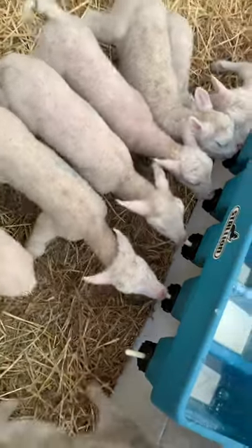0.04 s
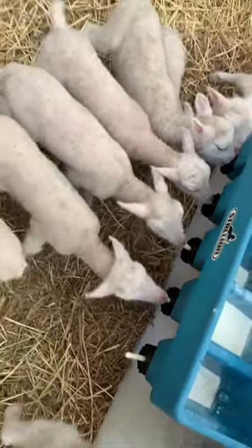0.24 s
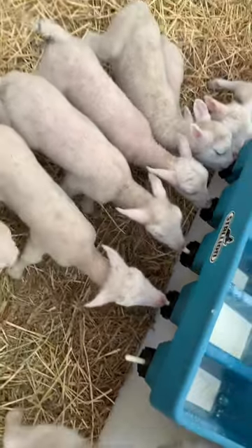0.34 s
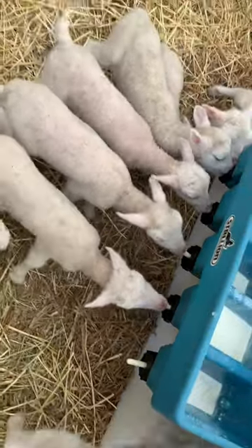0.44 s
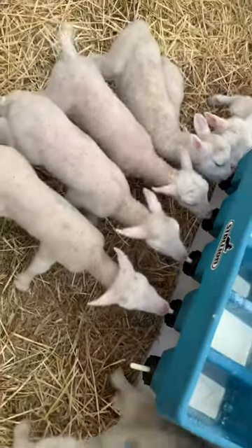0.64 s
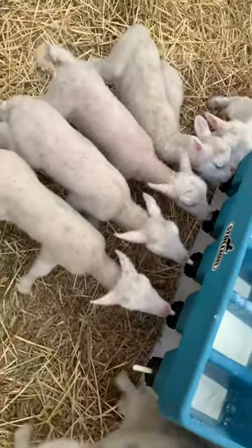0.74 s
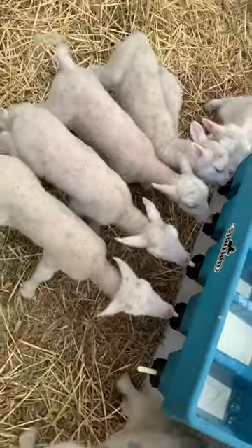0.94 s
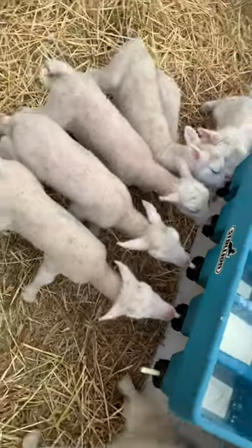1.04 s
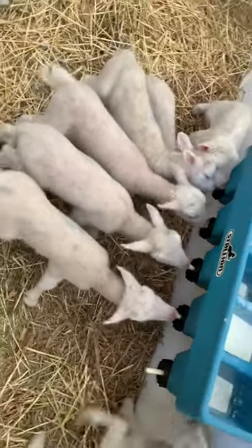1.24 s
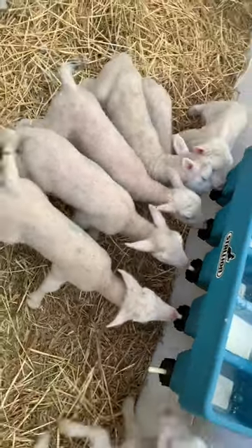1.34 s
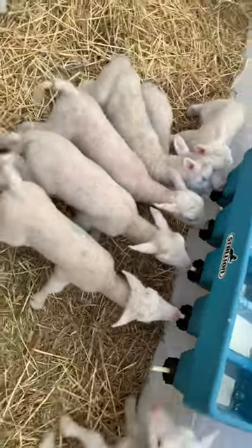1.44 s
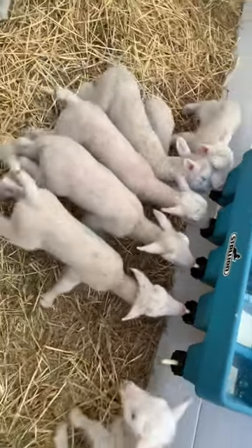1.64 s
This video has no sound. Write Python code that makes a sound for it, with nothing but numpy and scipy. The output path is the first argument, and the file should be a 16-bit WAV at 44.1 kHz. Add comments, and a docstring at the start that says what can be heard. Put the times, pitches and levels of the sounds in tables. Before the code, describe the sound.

A lamb gives one long, high bleat while muzzles knock a plastic milk feeder.

```python
"""Lambs at a milk feeder

Muzzles knock a plastic tub, which rings, and shoves set the whole feeder swaying. One lamb gives
a long, clear, high bleat that rises, holds and breaks off downwards: vocal-fold harmonics that
swell and fade. Underneath lie a low hum, barn rumble and the rustle and snap of straw."""
import sys
import numpy as np
from scipy import signal
from scipy.fft import rfft, irfft
from scipy.io import wavfile

SR = 44100
rng = np.random.default_rng(int(sys.argv[2]) if len(sys.argv) > 2 else 0)


def store_wav(level_fs):
    """Save 16-bit WAV to argv[1]."""
    pcm = np.round(np.clip(np.atleast_2d(level_fs), -1, 1) * 32767)
    wavfile.write(sys.argv[1], SR, pcm.T.astype(np.int16))


N = 74970
T = np.arange(N) / SR
BINS_HZ = np.fft.rfftfreq(N, 1 / SR)


def from_db(db):
    """Decibels to gain."""
    return 10 ** (np.asarray(db) / 20)


def unit_rms(x):
    """Scale to rms 1."""
    return x / np.sqrt(np.mean(x ** 2) + 1e-20)


def in_time(rows):
    """Value columns of a time table at every sample."""
    times, *columns = np.transpose(rows)
    return [np.interp(T, times, column) for column in columns]


def at_hz(rows, hz):
    """Interpolate a spectrum over log frequency."""
    freqs, values = np.transpose(rows)
    return np.interp(np.log(hz + 1e-9), np.log(freqs), values)


def drift(corner_hz):
    """Low-passed noise, rms 1."""
    hop = 40
    pole = np.exp(-2 * np.pi * corner_hz * hop / SR)
    noise = rng.standard_normal(N // hop + 2002)
    slow = signal.lfilter([1], [1, -2 * pole, pole * pole], noise)[2000:]
    return np.interp(np.arange(N) / hop, np.arange(len(slow)), unit_rms(slow))


def ring(x, hz, t60):
    """One mode: a unit impulse starts a decaying unit sine."""
    r, w = from_db(-60 / (t60 * SR)), 2 * np.pi * hz / SR
    return signal.lfilter([0, np.sin(w)], [1, -2 * r * np.cos(w), r * r], x + 1e-18)


def band(x, low_hz, high_hz, order=2):
    """Causal band-pass."""
    sos = signal.butter(order, [low_hz, high_hz], "band", fs=SR, output="sos")
    return signal.sosfilt(sos, x + 1e-18)


def decay(t, t60):
    """Envelope from t = 0, falling 60 dB in t60."""
    return (t >= 0) * np.exp(-np.log(1000) * np.maximum(t, 0) / t60)


def barn_reverb(x, t60=0.59, delay_s=0.0045, lowpass_hz=3260):
    """Diffuse, dull tail, alike on both sides in the bass."""
    t = T[:SR // 2]
    mid, side = rng.standard_normal((2, len(t))) * decay(t - delay_s, t60)
    side = band(side, 590, 21050, order=1)
    tail = signal.lfilter(*signal.butter(1, lowpass_hz, fs=SR), [mid + side, mid - side])
    return signal.fftconvolve(x[None], unit_rms(tail) / np.sqrt(len(t)), axes=1)[:, :N]


def hum(hz=95.6, rms_db=-51, waver_db=2.5):
    """Low tone of wavering level."""
    return from_db(rms_db + waver_db * drift(31)) * np.sqrt(2) * np.sin(2 * np.pi * hz * T)


# Barn noise spectrum: f/Hz, relative density/dB
BARN_SPECTRUM = [(25, -79), (60, 8), (90, -45), (140, -6), (250, -3.5), (450, -7.5), (800, -12),
                 (1500, -9.5), (3000, -16), (4500, -19), (6500, -7.5), (8000, -14.5), (11000, -9),
                 (15500, -19.5)]
# Barn noise envelope: t/s, level/dB
BARN_LEVEL = [(0, -43.5), (.15, -49), (.25, -42), (.5, -40), (.8, -50.5), (1.3, -48), (1.5, -49),
              (1.7, -46.5)]
# Left-right likeness: f/Hz, correlation
BARN_CORRELATION = [(100, 0.98), (300, 0.86), (1000, 0.36), (2500, 0.45), (6500, 0.27), (11000, 0.0064)]


def barn_noise(waver_db=1.5):
    """Rumble of the barn and hiss of trodden straw."""
    mid, side = rfft(rng.standard_normal((2, N))) * from_db(at_hz(BARN_SPECTRUM, BINS_HZ))
    alike = at_hz(BARN_CORRELATION, BINS_HZ)
    noise = irfft(np.sqrt(1 + alike) * mid + np.sqrt(1 - alike) * side * [[1], [-1]], N)
    return unit_rms(noise) * from_db(in_time(BARN_LEVEL)[0] + waver_db * drift(45))


# Breaking stalks: t/s, level before filter/dB
STRAW_SNAPS = [(0.128, -44), (0.156, -38), (1.425, -36), (1.621, -32)]


def straw_snaps(t60=0.013):
    """Stalks crack brightly under the hooves."""
    envelope = sum(from_db(db) * decay(T - onset, t60) for onset, db in STRAW_SNAPS)
    return band(envelope * rng.standard_normal(N), 4970, 19000, order=1)


# Soft, heavy shoves: t/s, level/dB, f/Hz, t60/s
SHOVES = [(0.043, -30.5, 88.7, 0.43), (0.0775, -42, 90, 0.18), (0.135, -22, 113, 0.078),
          (0.188, -35, 91, 0.062), (0.262, -33.5, 70.4, 0.4), (0.363, -27.5, 101, 0.2),
          (0.431, -34, 79.5, .15), (1.223, -34.5, 71, 0.13), (1.286, -32, 89.5, 0.14),
          (1.521, -36, 88, 0.079)]


def feeder_thumps(rise_s=0.014):
    """The whole feeder sways briefly after each shove."""
    out = np.zeros(N)
    for onset, db, hz, t60 in SHOVES:
        t = T - onset
        envelope = np.clip(t / rise_s, 0, 1) * decay(t, t60)
        out += from_db(db) * envelope * np.sin(2 * np.pi * hz * t)
    return out


# Tub modes: f/Hz, relative level/dB, t60/s
TUB_MODES = [(147, 5.5, 0.051), (218.4, 0, 0.13), (266.6, -7.5, 0.47), (333, 8.5, 0.057), (550, -11, 0.09),
             (705, 3.5, 0.024), (979, -10.5, 0.076), (1025, 9, 0.016), (1210, -41, 0.024),
             (1620, 8.5, 0.013), (2520, -45, 0.018), (3800, -19, 0.011)]


def tub_ring(contact):
    """Plastic tub ringing under a contact, peak 1."""
    body = sum(from_db(db) * ring(contact, hz, t60) for hz, db, t60 in TUB_MODES)
    return body / np.abs(body).max()


# Muzzle contacts: t/s, level/dB, centre f/Hz, rattle t60/s, relative tick level/dB
CONTACTS = [(0.1643, -32, 1220, 0.01, 6), (0.1931, -22.5, 1060, 0.1, -7), (0.198, -30.5, 318, 0.33, -32),
            (.221, -26, 1090, 0.17, -24), (0.227, -26.5, 447, 0.096, -34), (.238, -23.5, 285, 0.088, -30),
            (0.311, -19, 300, 0.082, -16), (.327, -28, 220, 0.2, -32), (.3745, -23, 1510, 0.1, 6.5),
            (.3775, -13.5, 1240, 0.038, -40), (.380, -27, 300, 0.053, -30), (0.4211, -7.5, 860, 0.019, -30),
            (.4226, -7.5, 650, 0.02, -35), (.4284, -10.5, 650, 0.0457, -26), (.432, -22.5, 152, 0.077, -34),
            (0.479, -29, 180, 0.036, -30), (0.676, -24, 3130, 0.022, -8), (1.191, -37, 353, 0.062, -35),
            (1.619, -34, 1390, 0.039, 6.5), (1.636, -37, 260, 0.063, -5)]


def muzzle_knocks(slap_db=-2.5, ring_db=-5.5, sharp_s=0.025, band_ratio=1.67):
    """Each contact, a push and a dying rattle, slaps the tub and sets it ringing."""
    out, t = np.zeros(N + SR), T[:SR // 3]
    for onset, db, hz, t60, tick_db in CONTACTS:
        noise, grit = rng.standard_normal((2, len(t)))
        push = (t == 0) * min(1, sharp_s / t60) ** 2  # long contacts are more scuffle than push
        rattle = 0.39 * np.sqrt(hz / SR) * noise * decay(t, t60)
        contact = band(push + rattle, hz / band_ratio, hz * band_ratio)
        slap = from_db(slap_db) * contact / np.abs(contact).max()
        body = from_db(ring_db) * tub_ring(contact)
        tick = from_db(tick_db) * 0.5 * band(grit, 2500, 13000, order=1) * decay(t, t60=0.04)
        start = int(onset * SR)
        out[start:start + len(t)] += from_db(db) * (slap + body + tick)
    return out[:N]


def in_pen(x, echo_s=0.00087, echo_db=-13, right_lag_s=0.0001, reverb_db=-24.5):
    """A reflection off the side of the pen widens the sound; the barn adds its tail."""
    echo = from_db(echo_db) * np.interp(T - echo_s, T, x)
    right = np.interp(T - right_lag_s, T, x)
    return np.array([x + echo, right - echo]) + from_db(reverb_db) * barn_reverb(x)


# Moving peak, lower mids: t/s, f/Hz, boost/dB
LOW_MID_PEAK = [(0.378, 1680, 16.5), (0.45, 1670, 9.5), (0.503, 2040, 5.5), (0.536, 1420, 8.5),
                (0.604, 2000, 14), (0.689, 1210, 8), (0.743, 1745, 17), (0.861, 1900, 5.5),
                (0.927, 1330, -0.5), (1.032, 1720, 5.5), (1.2, 1510, 6.5), (1.263, 1270, 8.5),
                (1.312, 1620, 17.5)]
# Moving peak, mids: t/s, f/Hz, boost/dB
MID_PEAK = [(0.4, 2750, 14), (0.498, 2570, 2.5), (0.665, 2420, 3), (0.73, 2520.0, 8.5), (0.875, 2280, 12),
            (1.024, 2660, 11.5), (1.102, 3000, 13.5), (1.233, 2820, 8)]
# Moving peak, upper mids: t/s, f/Hz, boost/dB
UPPER_MID_PEAK = [(0.404, 3610, 10.5), (0.498, 3510, 4.5), (0.623, 3330, 16.5), (0.671, 3570, 3),
                  (0.722, 3450, 16.5), (0.749, 3800, -3), (0.815, 3520, 17.5), (0.905, 3700.0, 4),
                  (0.956, 4060, 2), (1.013, 3600, 13.5), (1.068, 3940.0, 6.5), (1.171, 3560, 12.5),
                  (1.27, 3800, 10)]
# Broad moving peak, treble: t/s, f/Hz, boost/dB
HIGH_PEAK = [(0.428, 6460, 10.5), (0.548, 6070, 7), (0.8, 6780, 7.5), (0.896, 6280.0, 10.5),
             (1.056, 7170, 2.5), (1.096, 5600, 1), (1.259, 6420, 10)]


def swells_db(hz):
    """Four moving peaks make the bleat's harmonics swell and fade."""
    db = np.zeros(N)
    for rows, width_hz in ((LOW_MID_PEAK, 368), (MID_PEAK, 308), (UPPER_MID_PEAK, 360), (HIGH_PEAK, 680)):
        centre_hz, boost_db = in_time(rows)
        db += boost_db * np.exp(-((hz - centre_hz) / width_hz) ** 2)
    return db


def flutter(hz, depth=0.27, rate_hz=24, reference_hz=4680):
    """Stray reflections waver a harmonic's gain and phase, high ones more and faster."""
    scale = np.sqrt(hz / reference_hz)
    return 1 + depth * scale * (drift(rate_hz * scale) + 1j * drift(rate_hz * scale))


# Vocal-fold pitch: t/s, f/Hz
BLEAT_PITCH = [(0.32, 388.6), (0.37, 425.9), (0.4, 441.7), (0.42, 443.0), (0.44, 449.9), (0.465, 451.9),
               (0.51, 465.9), (0.535, 466.8), (0.575, 473.3), (0.625, 473.3), (0.68, 478.3), (0.76, 486.9),
               (0.815, 488.2), (0.85, 484.9), (0.885, 488.6), (0.95, 487.1), (1.0, 494.9), (1.09, 485.5),
               (1.17, 489.2), (1.23, 483.0), (1.265, 471.8), (1.33, 390.4)]
# Unsteadiness: t/s, rms jitter/fraction of pitch
BLEAT_JITTER = [(.33, 0.008), (.5, 0.0016), (1.21, 0.0016), (1.25, .006), (1.29, 0.008)]
# Harmonics before colouring: t/s, low level/dB, middle level/dB, treble level/dB
BLEAT_LEVELS = [(0.311, -39, -61.5, -60.5), (0.383, -52, -60, -57.5), (0.416, -38.5, -40, -42.5),
                (0.477, -42, -38.5, -39.5), (0.532, -56, -38, -34.5), (0.587, -33.5, -41, -35.5),
                (0.678, -41.5, -43, -36.5), (0.728, -36, -38.5, -35.5), (0.814, -39, -43.5, -35),
                (0.906, -38, -40.5, -35.5), (1.019, -36.5, -36.5, -33), (1.082, -37.5, -40.5, -34.5),
                (1.158, -37, -40.5, -35.5), (1.232, -39, -38, -36.5), (1.273, -40.5, -40.5, -44),
                (1.311, -46.5, -47, -56.5), (1.339, -60, -66, -71.1)]
# Fixed tone colour of the bleat: f/Hz, gain/dB
BLEAT_COLOUR = [(480.0, -12.5), (950.0, 2.5), (1450.0, -1), (1900.0, -2), (2430.0, -3.5), (2900.0, -11),
                (3400.0, 2), (3900.0, 1.5), (4400.0, 2.5), (4900.0, 7.5), (5350.0, 6), (5850.0, -1),
                (6700.0, 0.16), (7400.0, -2.5), (8300.0, 7), (9700.0, 3), (10700.0, -4), (11500.0, -4.5),
                (12500.0, -14), (14500.0, -11), (15500.0, -20)]
# Phase, left minus right: f/Hz, lead/rad
BLEAT_LEAD = [(480, 0.1), (970, 0.8), (3900, 2.01), (6800, 5.87), (14600, 17)]
# Level, left minus right: f/Hz, level/dB
BLEAT_PAN = [(970, -2), (3900, 0.5)]


def bleat(scatter_rad=2.04, treble_hz=4680, rasp_db=-17, tilt_db_per_octave=13, reverb_db=-12.5):
    """Vocal-fold harmonics, with a rasp on every cycle that grows when the voice is unsteady."""
    (pitch_hz,), (jitter,) = in_time(BLEAT_PITCH), in_time(BLEAT_JITTER)
    low_db, mid_db, treble_db = in_time(BLEAT_LEVELS)
    phase = 2 * np.pi * np.cumsum(pitch_hz * (1 + jitter * drift(147))) / SR
    harmonics, sides = np.zeros((2, N)), np.array([[0.5], [-0.5]])
    for k in range(1, 33):
        hz, held_hz = k * pitch_hz, k * np.median(pitch_hz)
        low_share = np.interp(held_hz, [990, 1365], [1, 0])
        treble_share = np.interp(held_hz, [3600, treble_hz], [0, 1])
        source_db = mid_db + low_share * (low_db - mid_db) + treble_share * (treble_db - mid_db)
        db = source_db + at_hz(BLEAT_COLOUR, hz) + swells_db(hz) + sides * at_hz(BLEAT_PAN, hz)
        waver = flutter(held_hz)
        # Throat and barn scatter the phases.
        angle = k * phase + scatter_rad * rng.standard_normal() + sides * at_hz(BLEAT_LEAD, hz)
        harmonics += from_db(db) * np.imag(waver * np.exp(1j * angle))

    puffs = rng.standard_normal(N) * (1 + np.cos(phase))
    colour_db = at_hz(BLEAT_COLOUR, BINS_HZ) + tilt_db_per_octave * np.log2(1 + BINS_HZ / treble_hz)
    lead = np.exp(1j * sides * at_hz(BLEAT_LEAD, BINS_HZ))
    breath = unit_rms(irfft(rfft(puffs) * from_db(colour_db) * lead, N))
    rasp = breath * from_db(treble_db + rasp_db) * (jitter / jitter.min()) ** 0.7

    start_s, end_s = BLEAT_LEVELS[0][0], BLEAT_LEVELS[-1][0]
    gate = np.interp(T, [start_s - 0.02, start_s, end_s, end_s + 0.02], [0, 1, 1, 0])
    voice = gate * (harmonics + rasp)
    return voice + from_db(reverb_db) * barn_reverb(voice[0])


def scene():
    """Stereo sum of barn, feeder and lamb."""
    return hum() + barn_noise() + straw_snaps() + feeder_thumps() + in_pen(muzzle_knocks()) + bleat()


# Microphone dips: f/Hz, notch width/Hz
MIC_NOTCHES = [(4650, 925), (9000, 1320), (13200, 540)]


def record(dry, cutoff_hz=15900):
    """Microphone with three treble dips and a steep low-pass."""
    for hz, width_hz in MIC_NOTCHES:
        for _ in range(2):
            dry = signal.lfilter(*signal.iirnotch(hz, hz / width_hz, fs=SR), dry)
    return signal.sosfilt(signal.ellip(12, 0.1, 90, cutoff_hz, fs=SR, output="sos"), dry)


dry = scene()
out = record(dry)
store_wav(out)
```